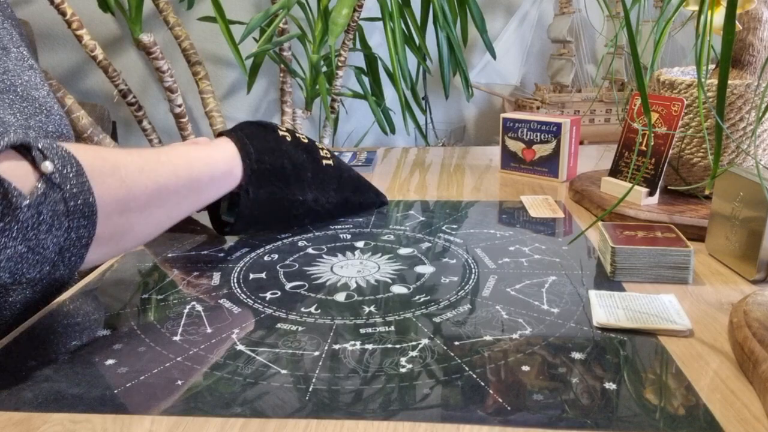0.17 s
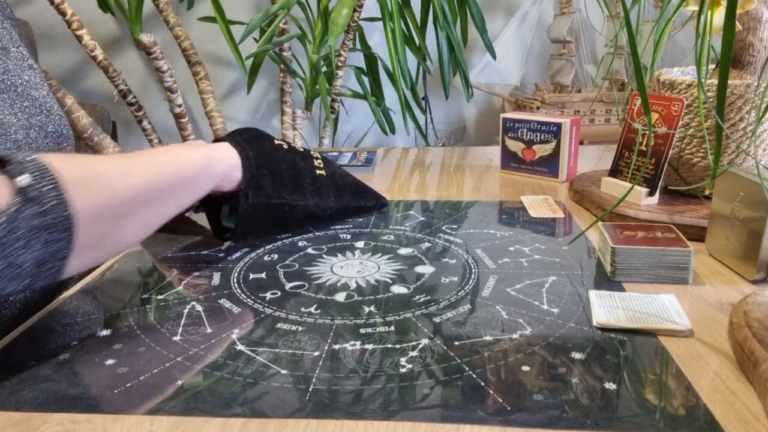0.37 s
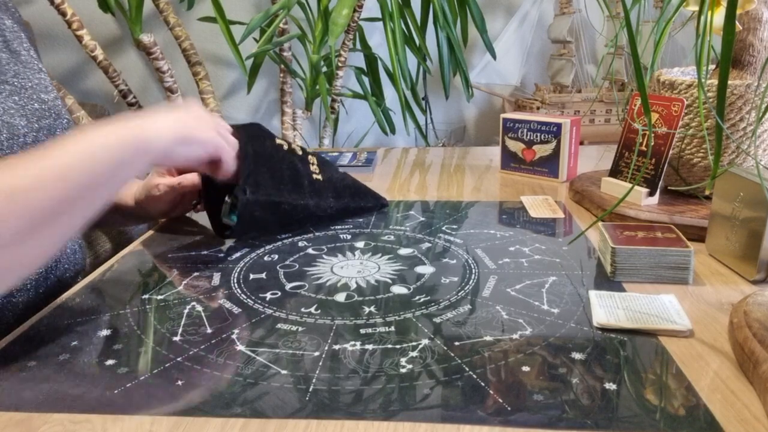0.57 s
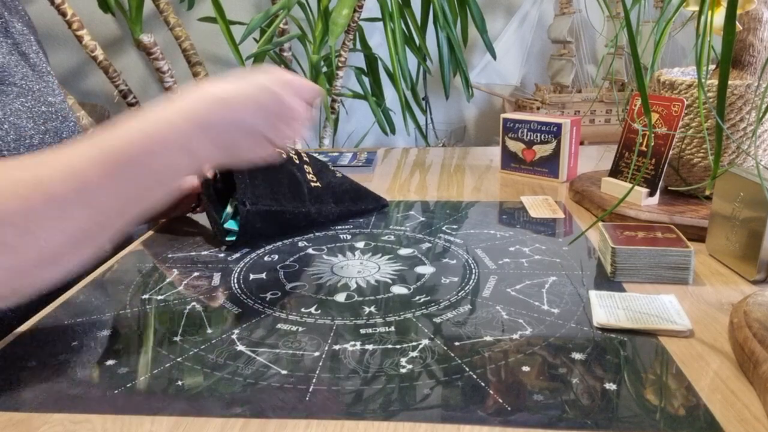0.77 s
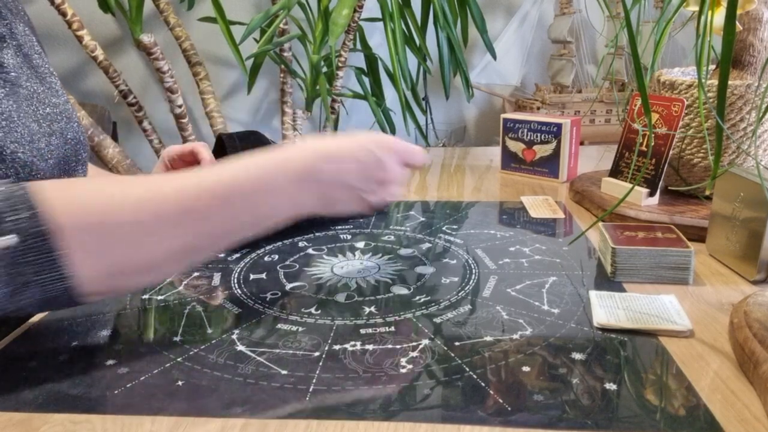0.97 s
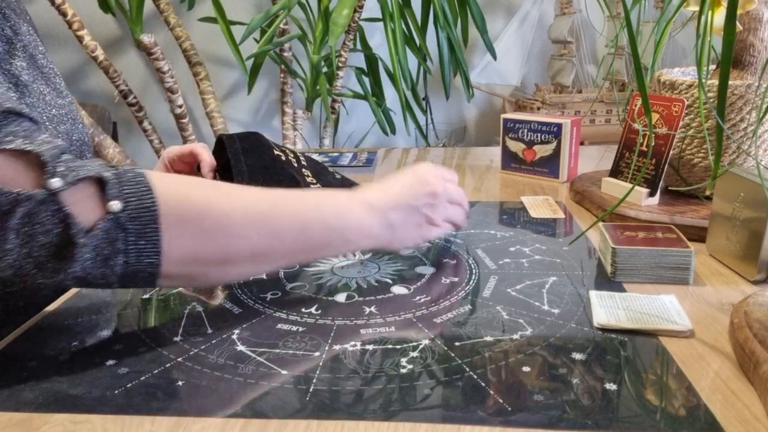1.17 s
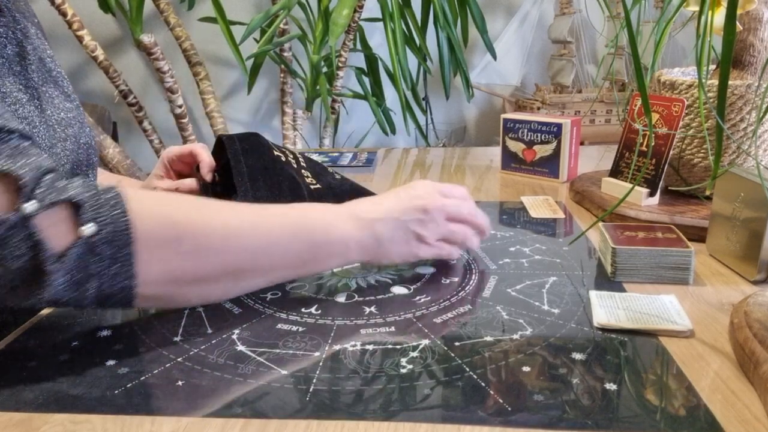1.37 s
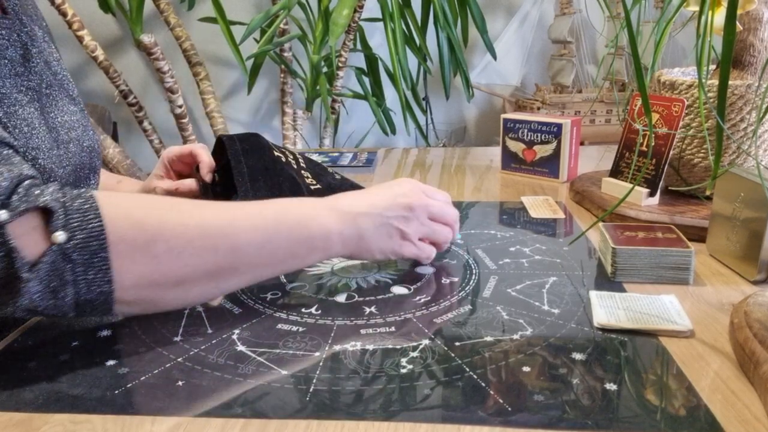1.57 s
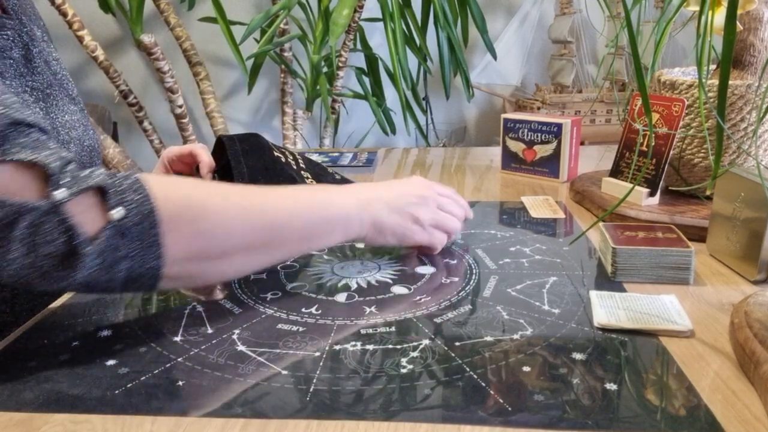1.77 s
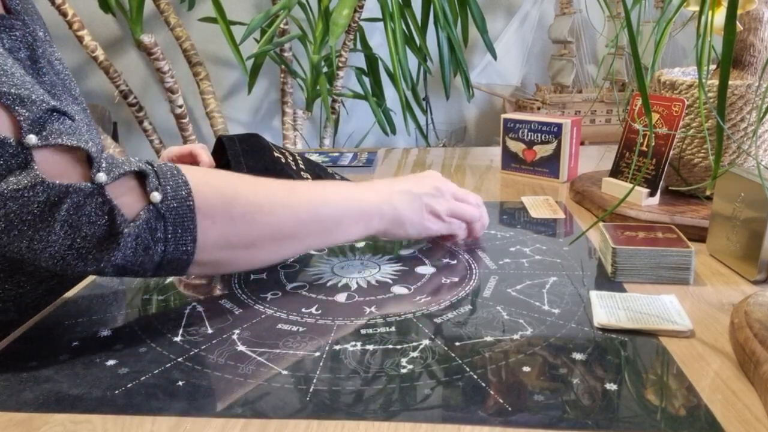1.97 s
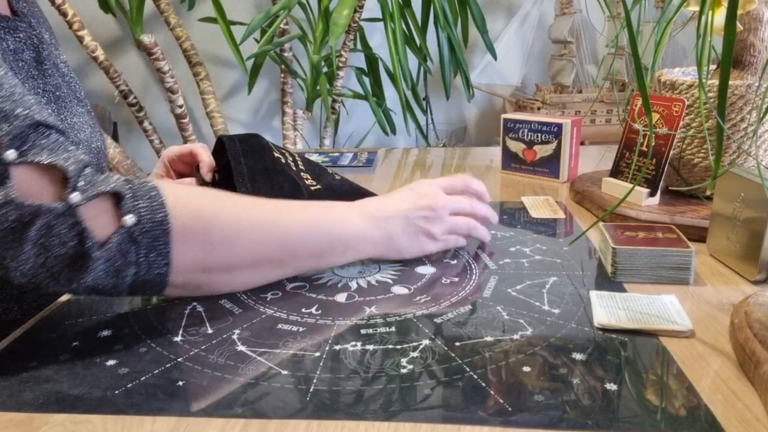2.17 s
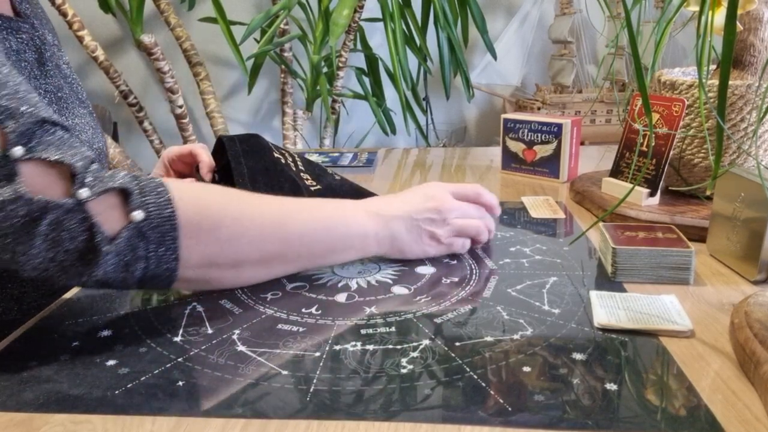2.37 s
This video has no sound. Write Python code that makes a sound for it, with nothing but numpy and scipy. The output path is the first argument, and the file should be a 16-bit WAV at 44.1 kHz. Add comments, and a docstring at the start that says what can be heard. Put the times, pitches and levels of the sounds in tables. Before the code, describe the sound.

Tokens click and scrape in a fabric bag, cloth rustles as the hand withdraws, then one piece snaps loudly on the tabletop and is slid slightly with low bumps; close microphone, quiet small room.

```python
"""A hard token is set down edge first, snaps flat with a quick rattle and is nudged along by the fingers:
broadband cracks excite its damped modes. Before that, a hand rummages in a cloth bag of such tokens, which
click as short modal rings while slip noise makes their scrape and the hiss of the cloth. Dull knocks are
coloured pulses on the table top, and its low modes boom softly under the arm. A small, live room answers
the contacts with decaying noise, over quiet air and faint hum."""
import sys
import numpy as np
from scipy import signal
from scipy.fft import rfft, irfft, next_fast_len
from scipy.io import wavfile

SR = 44100
rng = np.random.default_rng(int(sys.argv[2]) if len(sys.argv) > 2 else 0)


def wav_record(signal):
    """Record a signal, one row per channel, as 16-bit PCM in the file named by sys.argv[1]."""
    frames = np.transpose(np.atleast_2d(signal))
    bounded = np.clip(frames, -1, 1)
    # unit amplitude maps onto the largest positive 16-bit level
    quanta = np.round(bounded * 32767).astype(np.int16)
    wavfile.write(sys.argv[1], SR, quanta)


N = 106325  # length in samples
HIT = np.arange(SR // 2) / SR  # time axis of one contact, s


def amp(db):
    """Level law: decibels to amplitude gain."""
    return 10 ** (np.asarray(db) / 20)


def unit(x):
    """Normalization of mean power: scale to rms 1."""
    return x / np.sqrt(np.mean(x ** 2) + 1e-20)


def along(points, hz):
    """Logarithmic frequency scale: (Hz, value) points are interpolated on a log axis."""
    f, v = np.transpose(points)
    return np.interp(np.log(hz + 1), np.log(f + 1), v)


def fade(t60):
    """Exponential decay: the level falls 60 dB in t60 seconds."""
    return np.exp(-np.log(1000) * HIT / t60)


def filtered(x, response):
    """Linear filtering: the spectrum of x is multiplied by a response of frequency."""
    size = next_fast_len(N + SR // 2)
    hz = np.fft.rfftfreq(size, 1 / SR)
    return irfft(rfft(x, size) * response(hz), size)[:N]


def coloured(x, spectrum):
    """Spectral shaping: x is weighted by a (Hz, dB) curve and brought to rms 1."""
    return unit(filtered(x, lambda hz: amp(along(spectrum, hz))))


def pulse(spectrum, tilt_db=0):
    """Minimum phase: a folded cepstrum gives a causal pulse of this colour and unit energy."""
    size = len(HIT) // 2 * 2
    hz = np.fft.rfftfreq(size, 1 / SR)
    tilt = tilt_db * np.log2(hz / 1000 + .1)  # dB, per octave in the treble
    cepstrum = irfft(np.log(amp(along(spectrum, hz) + tilt)))
    # fold negative times onto positive ones
    cepstrum[1:size // 2] *= 2
    cepstrum[size // 2 + 1:] = 0
    p = irfft(np.exp(rfft(cepstrum)), len(HIT))
    return p / np.linalg.norm(p)


def add(track, s, sound):
    """Superposition: a sound is summed into the track from time s."""
    part = track[max(round(s * SR), 0):][:len(sound)]
    part += sound[:len(part)]


# Decay of the diffuse tail. Each row: frequency in Hz, t60 in seconds.
REVERB_DECAY = [(200, 0.32), (530, 0.31), (1300, .36), (3700, 0.24), (8300, 0.24), (14000, 0.21)]
ROOM_DELAY_S, ROOM_BUILD_S = 0.0035, 0.0017  # wait before the tail, then its build-up time constant
NEAR_DB, NEAR_T60_S = -1, 0.012  # scatter from the table and the things on it


def in_room(x, room_db):
    """Room impulse response: direct sound, near scatter and a fresh diffuse tail with its own decay per band."""
    hz, t, noise = signal.stft(rng.standard_normal(len(HIT)), SR, nperseg=256)
    decay = np.exp(-np.log(1000) * t / along(REVERB_DECAY, hz)[:, None])
    tail = signal.istft(noise * decay, SR)[1][:len(HIT)]
    tail = tail * (1 - np.exp(-np.maximum(HIT - ROOM_DELAY_S, 0) / ROOM_BUILD_S))
    near = fade(NEAR_T60_S) * rng.standard_normal(len(HIT))
    response = amp(room_db) * tail / np.linalg.norm(tail)
    response += amp(NEAR_DB) * near / np.linalg.norm(near)
    response[0] += 1  # direct sound
    return signal.fftconvolve(x, response)[:len(x)]


def ring(modes, pitch=1, upper_db=0, above_hz=0, scatter_db=0.5):
    """Modal superposition: damped sines, gains and signs vary by strike; those above above_hz get upper_db."""
    hz, db, t60 = np.transpose(modes)
    level_db = db + upper_db * (hz > above_hz) + scatter_db * rng.standard_normal(len(hz))
    gain = amp(level_db) * rng.choice([-1, 1], len(hz))
    t = HIT[HIT < 2 * t60.max()]
    decay = np.exp(-np.log(1000) * t / t60[:, None])
    sound = gain @ (decay * np.sin(2 * np.pi * pitch * hz[:, None] * t))
    return np.pad(sound, (0, len(HIT) - len(t)))


# Faint room hum. Each row: centre frequency in Hz, rms level in dB.
HUM_LINES = [(59, -67.5), (261, -70.5), (1000, -77)]
# Spectrum of the quiet air. Each row: frequency in Hz, relative level in dB.
AIR_SPECTRUM = [(20, -34), (35, -5), (55, 4), (75, 1.5), (140, -1.5), (200, -3), (252, -2), (315, -5.5),
                (490, -7), (750, -11.5), (1100, -15.5), (2270, -19), (8170, -23.5), (15500, -28)]
AIR_DB = -59.5  # rms level


def room_tone(width_hz=3):
    """Narrow-band noise: resonant filtering makes wavering hum lines, over the shaped noise of quiet air."""
    hum = np.zeros(N)
    for centre_hz, db in HUM_LINES:
        line = filtered(rng.standard_normal(N), lambda hz: 1 / (1 + ((hz - centre_hz) / width_hz) ** 2))
        hum += amp(db) * unit(line)
    return hum + amp(AIR_DB) * coloured(rng.standard_normal(N), AIR_SPECTRUM)


# Low modes of the table. Each row: frequency in Hz before the pitch ratio, relative level in dB, t60 in seconds.
TABLE_MODES = [(59.8, 5, .17), (120, -15, 0.16), (262.1, -14.5, .33)]
# The arm leaning on the table. Each row: start in seconds, level in dB before doubling, rise in seconds,
# gain of the modes above the lowest in dB.
ARM_THUMPS = [(.01, -45, 0.011, 2), (0.171, -68, 0.036, -13), (.345, -48.5, 0.028, 2),
              (0.681, -56, 0.021, -6), (0.781, -61, .02, -7), (1.03, -58, 0.0065, -10),
              (1.283, -56.5, 0.018, 23.5), (1.344, -56.5, 0.0062, 19), (1.855, -51.5, 0.01148, 12.5),
              (1.926, -36.5, .022, -6), (2.081, -49.5, 0.019, 4), (2.172, -53.5, 0.011, 9.5),
              (2.345, -52.5, 0.0084, 4)]


def thumps():
    """Modal excitation by a soft force: pushes and knocks swell the table's low modes gradually."""
    out = np.zeros(N)
    for s, db, rise, upper_db in ARM_THUMPS:
        swell = 1 - np.exp(-(HIT / rise) ** 2)
        boom = ring(TABLE_MODES, 0.99, upper_db, TABLE_MODES[0][0])
        add(out, s, 2 * amp(db) * swell * boom)
    return out


# Colour of the table top. Each row: frequency in Hz, relative level in dB.
TABLE_TOP_SPECTRUM = [(60, -23), (250, -9), (380, -10.5), (600, -2.5), (850, -0.5), (1050, 0), (1220, 4.5),
                      (1400, 1), (1750, 0), (2200, -8), (2700, -9.5), (4200, -20), (7000, -30),
                      (16000, -44)]
# Lingering ring of the table top. Each row: frequency in Hz, relative level in dB, t60 in seconds.
PANEL_MODES = [(869, -39.5, 0.29), (1180, -33.5, 0.24), (1268, -37.5, 0.35), (1613, -40, 0.43),
               (1810, -41, 0.28)]
# Dull knocks on the table top. Each row: start in seconds, level in dB before KNOCK_GAIN_DB,
# treble tilt in dB per octave, gain of the room tail and panel ring in dB.
TABLE_KNOCKS = [(.055, -36, 2, 7.5), (.067, -27, 5, -3.5), (0.1894, -39, 6, 6.5), (0.8713, -31.5, -2, -5),
                (1.2836, -22.5, -1, 8.5), (1.3465, -21, 3.5, 6.5), (1.353, -25.5, -0.5, 15.5),
                (1.843, -38.5, 4.5, 6.5), (1.8707, -33.5, 2.5, 2), (2.169, -37, 3.5, 3.5),
                (2.179, -58, 4, 1)]
KNOCK_GAIN_DB = 4.5


def knocks():
    """Impulse response of a panel: cushioned contacts sound the table top, and a faint ring lingers."""
    out = np.zeros(N)
    for s, db, tilt_db, room_db in TABLE_KNOCKS:
        knock = in_room(pulse(TABLE_TOP_SPECTRUM, tilt_db), room_db)
        knock += amp(room_db) * ring(PANEL_MODES)
        add(out, s, amp(db + KNOCK_GAIN_DB) * knock)
    return out


GRAINS_PER_S, GRAIN_SPREAD_DB, RUB_ROOM_DB = 1800, 3, 1.5  # mean slip rate, size spread, room tail gain


def friction(spectrum):
    """Stick-slip friction: dense tiny slips of uneven size, heard in the room and shaped to rms 1."""
    happens = rng.random(N) < GRAINS_PER_S / SR
    size = rng.standard_normal(N) * amp(GRAIN_SPREAD_DB * rng.standard_normal(N))
    return coloured(in_room(happens * size, RUB_ROOM_DB), spectrum)


# Colour of the tokens' scrape. Each row: frequency in Hz, relative level in dB.
SCRAPE_SPECTRUM = [(100, 9), (400, -7), (900, -2), (1500, -2), (2200, -1.5), (3000, -7), (3800, 0.5),
                   (4200, -1.5), (4900, -12.5), (6500, -18.5), (8200, -6), (9500, -13), (16000, -27)]
# Tokens scraping in the bag. Each row: time in seconds, level in dB before SCRAPE_GAIN_DB and the release.
SCRAPE_LEVEL = [(0, -39.5), (.025, -45), (.055, -42), (.09, -46), (.135, -52), (.176, -55.5), (.2, -44),
                (.25, -53.5), (.33, -51.5), (.45, -56), (.53, -64.5), (.64, -69.5), (.71, -56.5),
                (.78, -68.5), (.86, -74), (1.2, -78)]
# Colour of the cloth. Each row: frequency in Hz, relative level in dB.
CLOTH_SPECTRUM = [(1000, -13), (4000, -7), (6000, -7), (7500, 1.5), (9000, 2), (11000, -5), (14000, -6.5),
                  (16000, -5.5)]
# Cloth brushing the hand. Each row: time in seconds, hiss level in dB before CLOTH_GAIN_DB and the release.
BRUSH_LEVEL = [(0, -51.5), (.05, -52), (.13, -65), (.19, -47.5), (.26, -63.5), (.32, -50.5), (.36, -56),
               (.45, -61.5), (.5, -56.5), (.535, -50), (.57, -59), (.655, -60), (.69, -50), (.73, -64.5),
               (.79, -67), (.88, -55.5), (.95, -72.5), (1.1, -62.5), (1.2, -74)]
SCRAPE_GAIN_DB, CLOTH_GAIN_DB = -2, -6
RUB_END_S, RUB_RELEASE_DB_PER_S = 1.403, 100


def bag_rubbing():
    """Amplitude-modulated friction noise: tokens scrape and cloth hisses as the hand leaves the bag."""
    t = np.arange(N) / SR
    scrape_db = np.interp(t, *np.transpose(SCRAPE_LEVEL)) + SCRAPE_GAIN_DB
    hiss_db = np.interp(t, *np.transpose(BRUSH_LEVEL)) + CLOTH_GAIN_DB
    bag = amp(scrape_db) * friction(SCRAPE_SPECTRUM) + amp(hiss_db) * friction(CLOTH_SPECTRUM)
    return bag * amp(-RUB_RELEASE_DB_PER_S * np.maximum(t - RUB_END_S, 0))


# Colour of the token on the mat. Each row: frequency in Hz, relative level in dB.
SLIDE_SPECTRUM = [(30, -10), (60, 15.5), (130, -2), (200, -7.5), (260, 3.5), (350, -9.5), (800, -13.5),
                  (1600, -17), (3500, -28), (9000, -27), (16000, -43)]
SLIDE_START_S, SLIDE_END_S = 1.83, 1.95
SLIDE_RISE_S, SLIDE_FALL_S, SLIDE_DB = 0.017, 0.2, -48.5  # linear rise, time constant of the fall, level


def token_slide():
    """Sliding friction: fingers push the token over the mat in one stroke that rises fast and dies away."""
    t = np.arange(N) / SR
    rise = np.clip((t - SLIDE_START_S) / SLIDE_RISE_S, 0, 1)
    fall = np.exp(-np.maximum(t - SLIDE_END_S, 0) / SLIDE_FALL_S)
    return amp(SLIDE_DB) * rise * fall * friction(SLIDE_SPECTRUM)


# Modes of a token. Each row: frequency in Hz before the pitch ratio, relative level in dB,
# t60 in seconds before any damping by the table.
TOKEN_MODES = [(2400, -12, 0.0091), (3540, -10, 0.014), (3972, -2, 0.016), (4304, -14, 0.018),
               (7500, -10, 0.0068), (8130, -3, .009), (8370, -3.5, .009), (9900, -37, .005),
               (14500, -16, .003)]
UPPER_HZ = 6000  # modes above this have their own gain
# Tokens meeting in the bag. Each row: start in seconds, level in dB, pitch ratio,
# gain of the upper modes in dB (where negative, it weakens the crack too).
BAG_CLICKS = [(0.0377, -36, 0.96, 4), (0.0469, -41, 0.76, -9), (.0553, -28.5, 1.045, -8),
              (0.0625, -44, 2.6, -10), (0.0695, -40, 0.71, -12), (0.1049, -45.5, 1.02, -5),
              (0.151, -43, .91, 2), (0.1796, -40.5, .99, 8.5), (0.1886, -36, 1.03, -12),
              (0.207, -38.5, .98, -22), (0.257, -52, 1.07, -2), (0.305, -47.5, 0.94, -4),
              (0.3719, -41, 1.05, -6.5), (0.434, -36.5, .92, -22), (.4415, -43.5, 0.92, -18)]
CLICK_CRACK_DB, CLICK_CRACK_T60_S, CLICK_ROOM_DB = -4, 0.0043, -4  # crack and room relative to the click


def bag_clicks():
    """Impact excitation of modes: tokens strike each other with a very short ring and a burst of noise."""
    out = np.zeros(N)
    for s, db, pitch, upper_db in BAG_CLICKS:
        crack_db = CLICK_CRACK_DB + min(upper_db, 0)
        crack = amp(crack_db) * fade(CLICK_CRACK_T60_S) * rng.standard_normal(len(HIT))
        click = ring(TOKEN_MODES, pitch, upper_db, UPPER_HZ) + crack
        add(out, s, amp(db) * in_room(click, CLICK_ROOM_DB))
    return out


# Colour of the crack. Each row: frequency in Hz, relative level in dB.
CRACK_SPECTRUM = [(100, -31), (260, -22), (360, -23), (700, -6.5), (1230, 3.5), (1750, -2.5), (2100, -5.5),
                  (2800, 0), (3500, -4.5), (4500, -4.5), (6500, -1.5), (9500, -4), (12500, -3), (13800, -7),
                  (14800, -19), (16000, -15)]
# The token snapping flat and rattling. Each row: start in seconds, crack level in dB before CRACK_GAIN_DB,
# treble tilt in dB per octave, gain of the low modes in dB, gain of the upper modes in dB.
RATTLE_CONTACTS = [(1.319, -43, 7, -38, -41.5), (1.3449, -13.5, 1, -17, -26), (1.3462, -22.5, 1, -38, -13),
                   (1.3504, -20, -0.5, -31, -8), (1.3531, -19, -1.5, -26.5, -13),
                   (1.354, -11, -2.5, -39, -7.5), (1.3579, -18, 1.5, -30, -18),
                   (1.3576, -21.5, 3, -28, -12.5), (1.359, -20, 2.5, -39, -16.5), (1.399, -29, 3, -51, -28)]
CRACK_GAIN_DB, RATTLE_ROOM_DB = 6, -0.5
FLAT_DAMPING, FLAT_PITCH = 0.38, 1.0065  # lying on the table: share of the ring time left, pitch ratio


def rattle():
    """Contact damping: the token slaps down and chatters on its edges, and the table shortens its ring."""
    out = np.zeros(N)
    damped = [(hz, db, t60 * FLAT_DAMPING) for hz, db, t60 in TOKEN_MODES]
    for s, db, tilt_db, low_db, upper_db in RATTLE_CONTACTS:
        crack = amp(db + CRACK_GAIN_DB) * pulse(CRACK_SPECTRUM, tilt_db)
        token_ring = amp(low_db) * ring(damped, FLAT_PITCH, upper_db - low_db, UPPER_HZ)
        add(out, s, in_room(crack + token_ring, RATTLE_ROOM_DB))
    return out


def scene():
    """Superposition of pressures: every source sums at one microphone."""
    token_contacts = bag_clicks() + rattle()
    table = knocks() + thumps()
    rubbing = bag_rubbing() + token_slide()
    return (token_contacts + table + rubbing + room_tone())[None]


def record(dry, low_cut_hz=42, top_hz=15850):
    """Band limiting: the recorder weakens the deepest bass and keeps nothing above its top frequency."""
    low_cut = signal.butter(4, low_cut_hz, "high", fs=SR, output="sos")
    x = signal.sosfilt(low_cut, dry[0])
    return filtered(x, lambda hz: hz < top_hz)[None]


dry = scene()
out = record(dry)
wav_record(out)
```